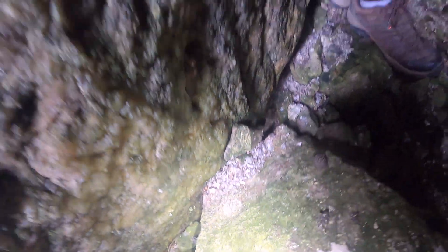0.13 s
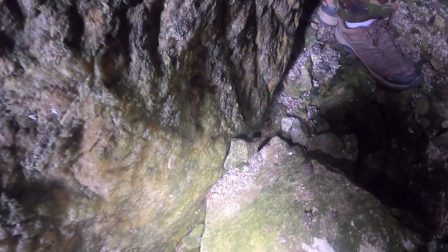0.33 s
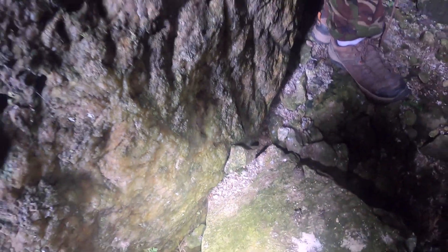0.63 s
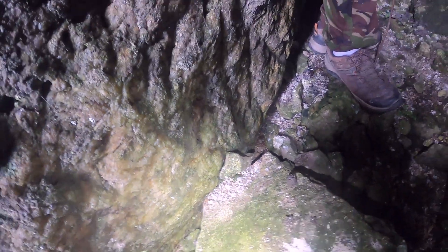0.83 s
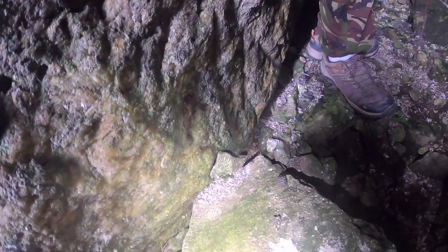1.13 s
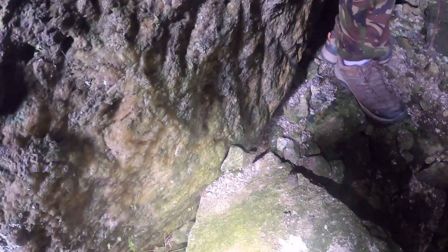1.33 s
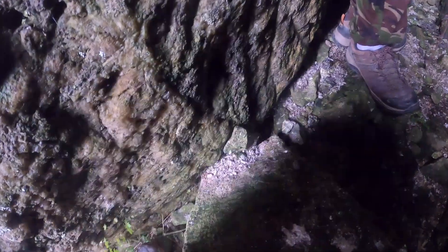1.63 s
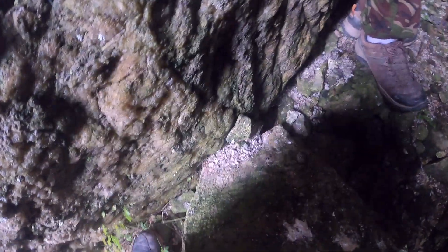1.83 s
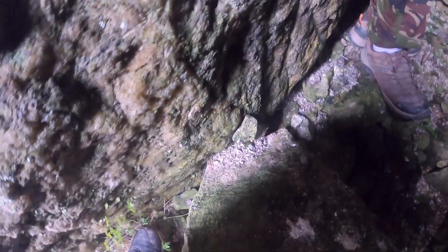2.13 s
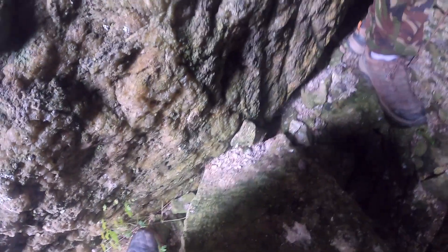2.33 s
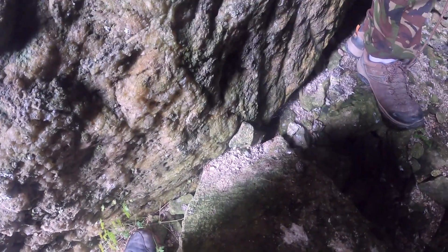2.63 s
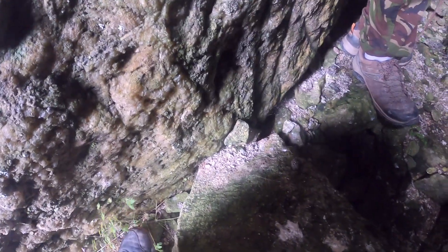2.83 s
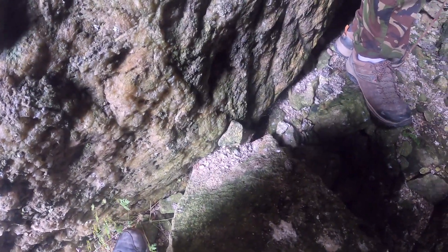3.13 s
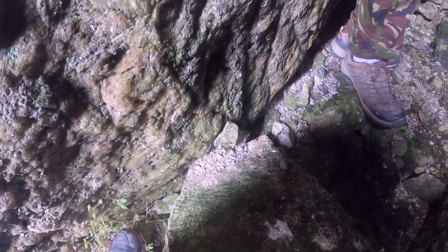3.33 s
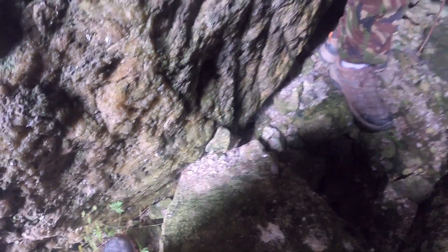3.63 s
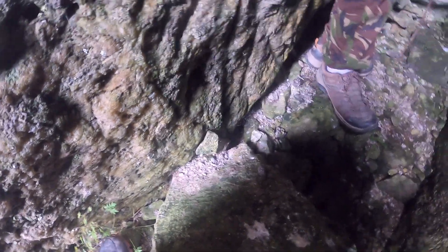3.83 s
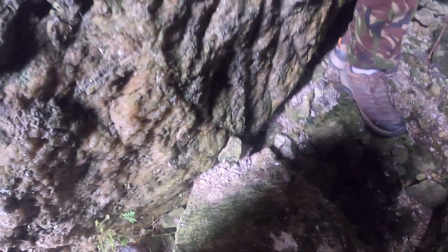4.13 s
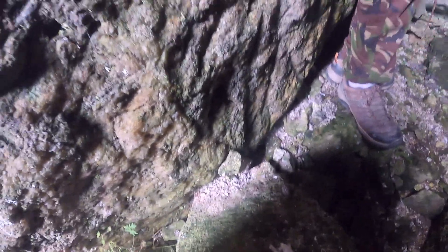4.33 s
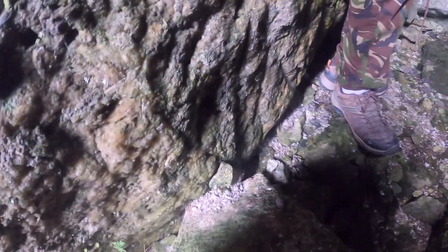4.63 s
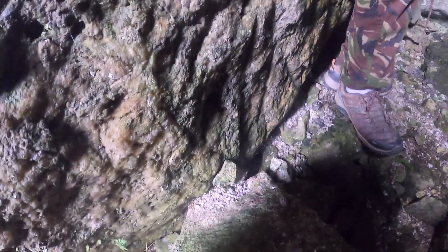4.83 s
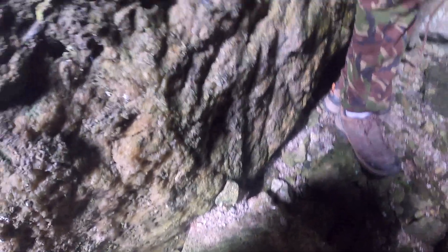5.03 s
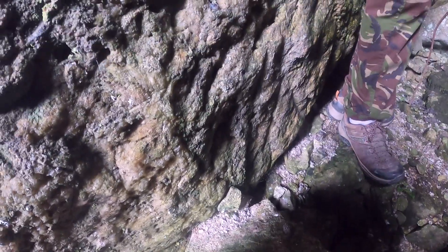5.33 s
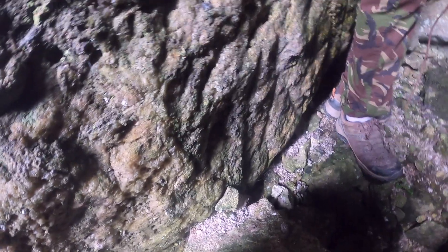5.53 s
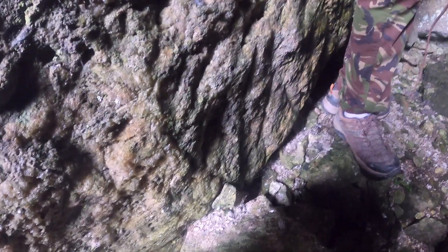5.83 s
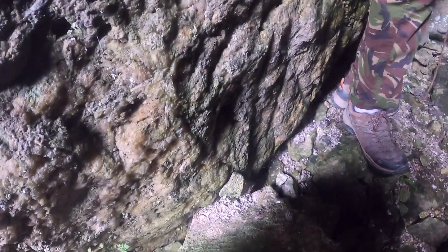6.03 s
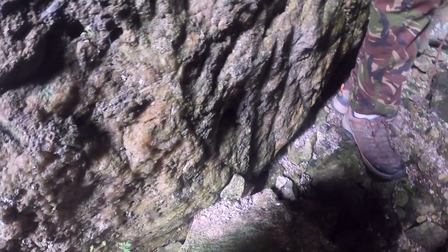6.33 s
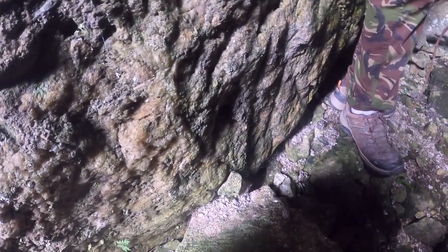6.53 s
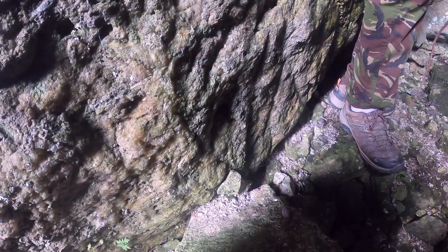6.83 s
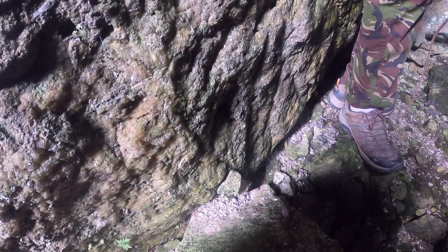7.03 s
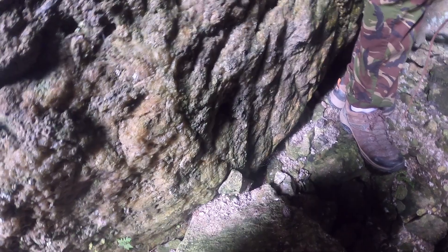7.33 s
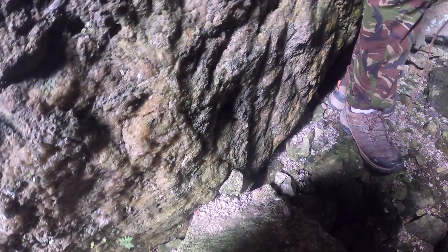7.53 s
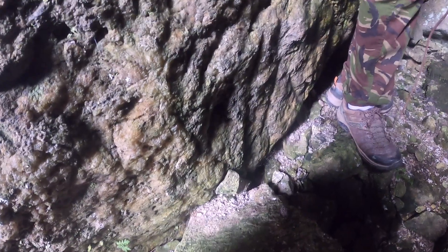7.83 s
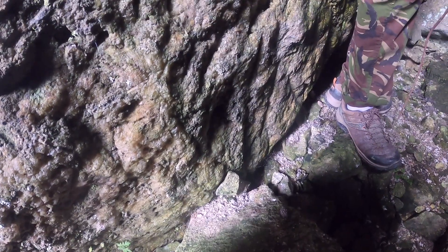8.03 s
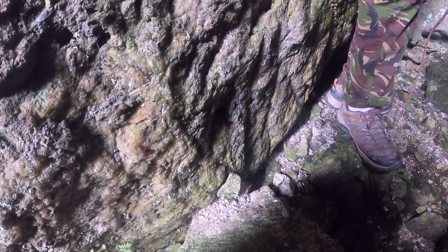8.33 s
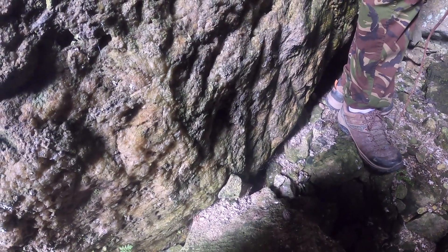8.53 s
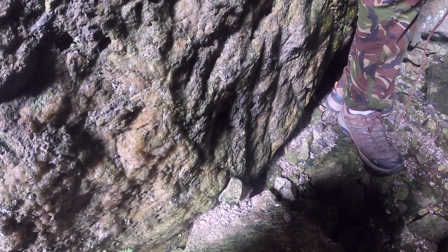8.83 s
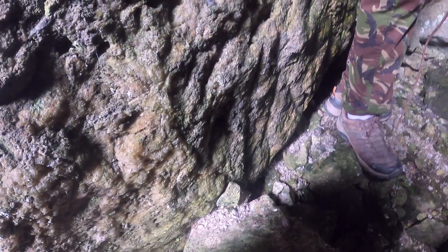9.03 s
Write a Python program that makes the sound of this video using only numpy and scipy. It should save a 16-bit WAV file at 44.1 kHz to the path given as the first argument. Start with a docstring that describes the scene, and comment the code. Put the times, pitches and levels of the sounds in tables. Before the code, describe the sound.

Close, handheld pickup in a quiet cave passage. Faint grit ticks open, then boots dislodge stones in a loud, dense run of hollow clacks. Knocks thin to soft taps, a second busier burst of clatter and gritty scraping follows midway, then sparser scuffs and a few sharp knocks fade into a low, dull hush. Low grip bumps and rumble run through it.

```python
"""Boots on loose rock in a cave passage

Stones knock and grit scrapes over a quiet floor; both excite one shared set of resonances.
Sliding stones groan, and a dull knock and a click join them, all as narrow-band noise; grit ticks are puffs.
A hand-held device hums and rumbles in the grip, with jolts that swell both.
A phase-shifted side signal makes the picture wide at first, then it narrows to near mono."""
import sys
import numpy as np
from scipy import signal
from scipy.fft import rfft, irfft
from scipy.io import wavfile
from scipy.ndimage import uniform_filter1d

SR = 44100
rng = np.random.default_rng(int(sys.argv[2]) if len(sys.argv) > 2 else 0)


def unload_audio(sound):
    """Save the sound as a 16-bit wav file, at the path given as the first command line argument."""
    columns = np.transpose(np.atleast_2d(sound))
    # keep every value between -1 and 1, then stretch to whole-number steps
    steps = np.round(np.clip(columns, -1, 1) * 32767)
    wavfile.write(sys.argv[1], SR, steps.astype(np.int16))


N = 404838

# Floor spectrum, relative. Each row: frequency in Hz, density in dB per Hz.
AIR_SPECTRUM = [(15, -41.5), (25, 2), (63, 0.5), (133, -17), (325, -7.5), (692, -10.5), (835, -14.5),
                (1190, -15.5), (1290, -13.5), (2270, -36), (4580, -40.5), (15800, -60.5)]
# Floor gain over time. Each row: time in seconds, gain in dB.
AIR_SWELL = [(0, 10), (.9, 9), (2.1, 4), (3.4, 4.5), (5.9, 8), (6.9, 1.5), (8.4, -0.5), (9.18, 1.5)]
AIR_BASE_DB, DRONE_HZ, DRONE_BASE_DB = -62, 210, -71.5  # levels before the swell

# Slow hum in the grip. Each row: time in seconds, level in dB.
HUM = [(0.0, -72), (0.54, -55), (0.84, -45), (1.28, -40), (1.45, -49.5), (2.1, -60.5), (2.48, -54.5),
       (2.96, -47), (3.71, -41), (4.27, -41), (5.29, -48.5), (6.21, -48.5), (6.41, -67), (6.9, -58),
       (7.29, -77.5), (7.59, -42.5), (7.95, -70.5), (9.18, -70)]
# Jolts of the held device. Each row: time in seconds, hum in dB, rumble in dB.
JOLTS = [(.64, -43, -73), (.78, -47.5, -43), (1.05, -37, -43), (1.151, -32, -46), (1.41, -31.5, -58),
         (1.71, -35.5, -60), (1.789, -33.5, -56), (2.48, -47.5, -48), (3.73, -34.5, -42.5),
         (4.14, -40.5, -36.5), (4.292, -41, -27), (4.518, -29, -24), (4.7, -49.5, -40), (5.19, -40.5, -36),
         (5.6, -33, -39.5), (6.106, -27.5, -62.5), (6.29, -39, -55), (6.41, -44, -49), (6.771, -41, -50),
         (6.93, -48.5, -72), (7.41, -42, -42.5), (7.592, -30, -30.5), (9.16, -48.5, -49)]
# Handling rumble spectrum, relative. Each row: frequency in Hz, density in dB per Hz.
RUMBLE_SPECTRUM = [(20, 6), (40, -4.5), (100, 2.5), (200, 5.5), (260, 6), (400, 9), (700, -45.5)]
JOLT_SPAN_S = 0.0097
RUMBLE_FLICKER_DB, RUMBLE_FLICKER_S = 4.5, 0.015

# Boot scuffs. Each row: start in seconds, rise in seconds, length in seconds, grind centre in Hz,
# grind in dB, grit hiss in dB, rumble in the grip in dB.
SCUFFS = [(0.088, 0.087, 0.28, 1267, -62, -76, -65.5), (0.33, 0.19, 0.16, 734, -51, -61, -56),
          (0.697, 0.023, 0.08, 582, -48, -53.5, -49.5), (0.862, 0.3, 0.29, 930, -41, -48.5, -46),
          (1.02, 0.023, 0.06, 1085, -35.5, -68, -59.5), (1.095, 0.04, 0.17, 1000, -32, -63, -50.5),
          (1.109, .04, 0.13, 2510, -45, -48, -56.5), (1.18, 0.05, 0.061, 1500, -39.5, -53.5, -53),
          (1.424, 0.021, 0.097, 836, -44.5, -84, -57.5), (1.551, .02, 0.35, 790, -47, -77, -66.5),
          (1.869, 0.024, 0.25, 800, -60.5, -72, -66), (2.17, 0.06, 0.17, 1300, -46.5, -60, -55.5),
          (2.413, 0.024, 0.071, 644, -44, -60, -61.5), (2.636, .02, .3, 556, -44.5, -56.5, -49.5),
          (2.983, .04, 0.29, 600, -53, -64.5, -52.5), (3.617, 0.055, 0.43, 565, -40, -49.5, -44),
          (3.811, 0.023, 0.045, 1920, -40.5, -40.5, -43), (3.942, 0.039, 0.16, 1217, -45.5, -51, -42),
          (4.152, 0.037, 0.5, 716, -49, -92, -51), (4.237, 0.018, 0.11, 1740, -48, -53, -49.5),
          (4.373, 0.065, 0.27, 695, -65, -43.5, -44), (4.581, 0.021, 0.083, 693, -38, -39, -42),
          (4.701, 0.031, 0.16, 661, -42, -44.5, -43.5), (4.912, 0.026, 0.28, 670, -48.5, -56, -49.5),
          (5.044, 0.071, 0.11, 1160, -44.5, -46.5, -38.5), (5.126, 0.015, 0.035, 1500, -41, -44.5, -50),
          (5.226, 0.022, 0.26, 562, -51, -68, -54.5), (5.412, 0.14, 0.35, 712.5, -45.5, -49, -48.5),
          (5.8, 0.02, 0.06, 600, -56.5, -71, -56.5), (5.901, 0.064, 0.29, 688, -47, -55.5, -45),
          (6.192, 0.037, 0.28, 541, -43, -49, -45), (6.566, 0.017, .4, 600, -63, -71, -63.5),
          (7.408, .02, 0.35, 536, -40.5, -50, -47), (7.5, 0.029, 0.15, 1600, -45, -49, -57.5),
          (7.79, 0.077, 0.14, 541, -46, -49.5, -46), (7.995, 0.02, 0.2, 700, -63, -80, -63.5),
          (8.05, .06, 0.15, 688, -56.5, -67, -60.5), (9.089, 0.19, 0.11, 1100, -39, -53.5, -52)]
# Shared stone modes. Each row: frequency in Hz, nominal width in Hz, relative level in dB.
STONE_MODES = [(489.4, 110, 9.5), (685, 680, 3), (860.4, 100, 6.5), (1088, 130, 3), (1292, 390, 6.5),
               (1720, 24, 10), (1978, 100, 8), (2540, 100, 8), (3153, 180, -3.5), (3430, 400, -20.5),
               (4300, 340, -7), (5314, 490, -16)]
# Grit hiss spectrum, relative. Each row: frequency in Hz, density in dB per Hz.
GRIT_SPECTRUM = [(530, -20), (900, 0.5), (1190, -8.5), (1990, -5), (2210, -13.5), (5510, -16),
                 (6360, -22.5), (7800, -21), (11100, -46.5), (12800, -41.5), (15800, -77)]
SCUFF_SAG_DB_PER_S, SCUFF_T60_S = 14.5, 0.42
GRIT_FLICKER_DB, GRIT_FLICKER_S = 2.5, 0.012
SOFT_HZ = 5160  # dusty contacts lose the top of the treble

# Grit ticks. Each row: time in seconds, peak in dB, centre in Hz.
TICKS = [(0.126, -54, 5590), (0.1395, -46, 2520), (0.1704, -41, 2420), (0.19, -41, 2570),
         (0.206, -43, 2320), (0.236, -39.5, 2450), (0.2514, -59, 2350), (0.2708, -56, 2460),
         (0.3082, -45, 4200), (0.392, -58, 2100), (0.716, -43, 2000), (0.9965, -35, 1910),
         (1.0492, -31, 2560), (1.1294, -31, 2600), (1.4817, -63, 2570), (2.5575, -42.5, 1890),
         (2.769, -63, 2170), (3.015, -49, 3160), (3.0754, -43, 1980), (3.654, -51, 2230),
         (4.408, -40, 1900), (4.473, -43, 1920), (4.6067, -29, 1990), (4.726, -35, 1940),
         (5.3407, -29.5, 2020), (5.747, -29, 1860), (5.811, -53, 2000), (6.006, -55, 2490),
         (6.02, -33, 1900), (6.158, -45.5, 4500), (6.988, -49, 2000), (7.8379, -31, 2630),
         (8.118, -62, 2600), (8.187, -49, 1947), (9.167, -36, 4500)]
TICK_T60_S, TICK_Q, TICK_EDGE_DB = 0.0077, 5.1, -29.5

# Stone knocks. Each row: time in seconds, level in dB, ring centre in Hz,
# crack treble in dB re level, thump in dB re level, nominal ring decay (t60) in seconds.
KNOCKS = [(0.13, -46, 430, -27, -11.5, 0.047), (0.169, -36, 1460, -4.5, -30.5, 0.015),
          (0.188, -48.5, 602, -1, -14.5, 0.052), (0.235, -44, 1310, -18, -14.5, 0.042),
          (0.304, -52, 410, -13, -23.5, 0.03), (0.396, -44, 484, -16, -19.5, 0.032),
          (0.721, -46, 404, 8, -17, 0.023), (0.965, -14.5, 1230, -31.5, -30.5, 0.011),
          (1.015, -16.5, 1147, -24, -24.5, 0.045), (1.057, -16, 1070, -28, -27.5, 0.06),
          (1.057, -21, 2590, -18, -37.5, 0.025), (1.06, -20, 480, -39, -29.5, 0.039),
          (1.09, -20.5, 477, -37, -30.5, 0.035), (1.086, -14, 910, -29, -33, 0.025),
          (1.086, -13, 2620, -11.5, -35.5, 0.02), (1.118, -24, 525, -34, -17.5, 0.035),
          (1.14, -20.5, 1090, -28, -14, 0.03), (1.148, -17.5, 950, -17, -30, 0.063),
          (1.16, -20.5, 1035, -11, -27.5, 0.016), (1.171, -21, 1170, -27, -28, 0.027),
          (1.19, -24, 1160, -19, -29, 0.035), (1.214, -22, 1117, -32, -26, 0.037),
          (1.259, -26.5, 2630, -29, -39, 0.03), (1.266, -20.5, 870, -18, -23, 0.024),
          (1.289, -16.5, 906, -30, -26, 0.025), (1.296, -7, 875, -15.5, -32, 0.025),
          (1.302, -6, 946, -41, -31, 0.014), (1.347, -11.5, 920, -43, -23.5, 0.026),
          (1.362, -7, 900, -49, -22, 0.016), (1.381, -7, 890, -22, -22.5, 0.015),
          (1.391, -10, 840, -46, -28.5, 0.024), (1.525, -29, 897, -37, -32.5, 0.04),
          (1.545, -12.5, 1020, -33, -40.5, 0.024), (1.567, -12.5, 1065, -22.5, -47, 0.014),
          (1.617, -20.5, 1820, -19, -40, 0.025), (1.63, -14.5, 953, -49, -33, 0.04),
          (1.659, -14.5, 1000, -35, -32.5, 0.018), (1.678, -25, 484, -37, -25, 0.023),
          (1.694, -19, 516, -12.5, -18, 0.016), (1.697, -13, 658, -27, -21.5, 0.015),
          (1.775, -12.5, 827, -18.5, -20.5, 0.024), (1.786, -20, 500, -42, -11, 0.043),
          (1.804, -15, 1230, -44, -21, 0.018), (1.824, -12, 927, -21, -38.5, 0.022),
          (1.83, -11.5, 1236, -9.5, -38.5, 0.025), (1.885, -25.5, 458, -44, -6, 0.016),
          (1.9, -25.5, 530, -41, -6, 0.027), (1.974, -40.5, 900, -46, -14.5, 0.028),
          (2.065, -39, 830, -34, -27, 0.033), (2.105, -16.5, 1025, -56, -42.5, 0.0082),
          (2.198, -18, 986, -53, -30, 0.012), (2.22, -12, 820, -46, -37, 0.02),
          (2.283, -14, 980, -20, -26, 0.038), (2.293, -20.5, 2047, -26, -34, 0.024),
          (2.293, -15, 828, -23, -28.5, 0.026), (2.301, -16.5, 909, -23, -25.5, 0.02),
          (2.375, -22, 835, -18.5, -36.5, 0.021), (2.432, -33.5, 840, -30, -29.5, 0.028),
          (2.447, -31.5, 473, -35, -14.5, 0.025), (2.445, -22.5, 1265, -11, -11.5, 0.016),
          (2.518, -43, 475, -4, -21, 0.014), (2.63, -27, 572, -28, -28.5, 0.024),
          (2.654, -26.5, 870, -18, -20.5, 0.016), (2.898, -29, 522, -42, -21, 0.048),
          (3.14, -34.5, 790, -26, -21.5, 0.013), (3.195, -41, 890, -35, -21, 0.027),
          (3.234, -30.5, 510, -13, -10, 0.029), (3.331, -36.5, 530, -25, -14.5, 0.016),
          (3.461, -41, 530, -19, -8.5, 0.043), (3.524, -41.5, 480, -21.5, -7, 0.034),
          (3.632, -38, 474, -40, -16.5, 0.023), (3.706, -21.5, 1376, -15, -6, 0.016),
          (3.809, -36.5, 440, -20, -9, 0.053), (3.841, -12.5, 1170, -9, -21.5, 0.022),
          (4.121, -15, 774, -26, -22, 0.021), (4.258, -35.5, 1700, -23, -11.5, 0.03),
          (4.266, -23.5, 1680, -15, -30.5, 0.04), (4.278, -7, 1950, -11.5, -8.5, 0.011),
          (4.286, -18.5, 420, -30.5, -10, 0.034), (4.388, -14, 692, -39, -33, 0.014),
          (4.43, -27, 645, -30, -18, 0.052), (4.509, -14.5, 713, -4.5, -5, 0.012),
          (4.516, -24, 790, -29, -10, 0.026), (4.617, -13.5, 835, -51, -32.5, 0.023),
          (4.622, -15.5, 525, -50, -31, 0.036), (4.638, -15.5, 670, -49, -27.5, 0.03),
          (4.66, -23.5, 610, -30, -27, 0.037), (4.678, -21.5, 483, -14, -10.5, 0.012),
          (4.724, -29.5, 794, -28, -24, 0.045), (4.743, -22.5, 540, -20, -17.5, 0.012),
          (4.808, -35, 415, -6, -15, 0.028), (4.842, -23.5, 640, -24, -9, 0.024),
          (4.946, -33.5, 479, -12, -13, 0.047), (4.995, -28, 705, -16, -19.5, 0.011),
          (5.071, -22, 506, -14.5, -13.5, 0.023), (5.094, -27.5, 825, -13, -18.5, 0.034),
          (5.13, -9, 734, -33, -40, 0.013), (5.192, -21, 510, -34, -10.5, 0.014),
          (5.273, -29, 490, -54, -18, 0.017), (5.339, -32, 497, -11, -15, 0.097),
          (5.39, -32.5, 930, -0.5, -15, 0.024), (5.494, -36, 930, -10, -22, 0.017),
          (5.579, -30.5, 475, -8.5, -12.5, 0.028), (5.597, -27, 450, -3.5, -16, 0.06),
          (5.643, -29.5, 1290, 0.5, -28, 0.033), (5.744, -32, 526, -12, -13.5, 0.036),
          (5.81, -41.5, 487, -29, -8, 0.05), (6.018, -28, 480, -9.5, -12.5, 0.081),
          (6.043, -18, 535, -15.5, -50.5, 0.014), (6.056, -10, 885, -15.5, -18, 0.014),
          (6.104, -32.5, 480, -15, -5.5, 0.038), (6.156, -53.5, 1210, -11, -10, 0.014),
          (6.248, -30.5, 490, -37, -17, 0.014), (6.555, -39, 500, -6.5, -33, 0.038),
          (6.76, -35, 505, -54, -21, 0.022), (6.927, -37.5, 490, -55, -12.5, 0.0103),
          (6.986, -35.5, 483, -24, -8.5, 0.013), (6.987, -38, 2220, -19, -27.5, 0.016),
          (7.233, -47.5, 518, -19, -24, 0.017), (7.397, -24, 457, -17.5, -12.5, 0.028),
          (7.476, -23.5, 465, -18, -42, 0.025), (7.558, -34.5, 519, -3, -4, 0.018),
          (7.595, -12, 1490, -3.5, -37, 0.0093), (7.663, -30.5, 450, -9, -8.5, 0.028),
          (7.837, -38.5, 438, -1, -12, 0.025), (8.125, -42, 740, -24, -22.5, 0.043),
          (8.188, -41.5, 1960, -7, -20.5, 0.014), (8.298, -49.5, 650, -33, -21.5, 0.031),
          (8.348, -44, 487, -41, -27, 0.0077), (8.403, -47.5, 458, -27, -14, 0.017),
          (9.019, -43, 455, -46, -9.5, 0.018), (9.118, -33, 526, -30, -9.5, 0.063),
          (9.155, -27, 440, -21, -16, 0.025)]
OWN_SHARE = 0.51  # struck stone's own note against the shared modes
SWELL_SHARE = 0.034  # attack time per second of t60
BODY_LOW_HZ = 355  # small stones radiate little below this
CRACK_CREST_DB = 5  # crack peak above its treble level, before softening

# Narrow-band noises: sliding stones, plus a dull knock at 1.764 s and a click at 6.975 s.
# Each row: start in seconds, length in seconds, pitch in Hz, level in dB.
NARROW_NOISES = [(0.73, 0.051, 4430, -61.5), (1.11, 0.09, 2530, -39), (1.257, 0.032, 2580, -34),
                 (1.429, 0.06, 888, -26.5), (1.44, 0.05, 3220, -63), (1.484, 0.035, 903, -33.5),
                 (1.732, 0.035, 513, -41), (1.764, 0.015, 471, -23), (2.452, 0.049, 859, -43.5),
                 (2.274, 0.026, 788, -27), (4.248, 0.033, 1700, -51), (4.932, 0.026, 2900, -47.5),
                 (5.162, 0.026, 1820, -39), (6.975, 0.032, 2500, -64), (7.183, 0.055, 2900, -77.5),
                 (7.379, 0.038, 2740, -54.5), (7.561, 0.082, 4490, -38)]
NARROW_NOISE_Q = 14

# Stereo picture. Each row: time in seconds, side gain in dB, side phase lean in rad,
# lift of the top treble in dB.
WIDTH = [(0, -6.5, -0.35, -1.5), (.5, -6, -0.35, 7), (.85, -6, -0.34, 3), (1, -3.5, 0.27, -1.5),
         (1.85, -3.5, 0.23, -6), (2.15, -8, 0.23, -4), (2.5, -17.5, 0.26, 0), (2.8, -24, 0, -1),
         (3.05, -63.5, -0.042, -0.5), (9.18, -52, -0.33, -2)]
# Side response before the width gain. Each row: frequency in Hz, gain in dB, phase in rad.
SIDE_PORT = [(59, -10, -1.5), (200, -11, -1), (400, -0.5, -1.82), (810, 3.5, -2), (1300, 3, -1.58),
             (2400, 4, -1), (4400, 1.5, -1), (8000, 5, -2), (15000, 8.5, -3)]
LIFT_LOW_HZ, LIFT_HIGH_HZ = 5940, 12000
TOP_LAG_S, TOP_SIDE_DB = 0.004, -2.5  # top treble enters the side again, late
EDGE_HZ = 15900


def gain_of(db):
    """Decibels to an amplitude factor."""
    return 10 ** (np.asarray(db) / 20)


def evened(x):
    """Scales to rms 1."""
    return x / np.sqrt(np.mean(x ** 2) + 1e-20)


def read(points, hz, column=1):
    """Interpolates a spectrum table over log frequency."""
    table = np.transpose(points)
    return np.interp(np.log(hz + 1), np.log(table[0] + 1), table[column])


def follow(rows):
    """Interpolates each column of a time table to every sample."""
    s, *columns = np.transpose(rows)
    return [np.interp(np.arange(N) / SR, s, column) for column in columns]


def coloured(x, points):
    """Filters x by a spectrum table, then scales to rms 1."""
    response = gain_of(read(points, np.fft.rfftfreq(N, 1 / SR)))
    return evened(irfft(rfft(x) * response, N))


def ring(x, hz, width_hz):
    """Two-pole resonance; its bandwidth sets the decay."""
    r = np.exp(-np.pi * width_hz / SR)
    return signal.lfilter([1 - r, 0, r - 1], [1, -2 * r * np.cos(2 * np.pi * hz / SR), r * r], x)


def flicker(db, span_s):
    """Random gain, db rms of wander over about span_s, at rms 1."""
    size = max(round(span_s * SR), 1)
    wander = uniform_filter1d(uniform_filter1d(rng.standard_normal(N), size), size)
    return evened(gain_of(db * evened(wander)))


def grains(per_s, spread_db, share):
    """Sparse clicks of very unequal size mixed into even noise."""
    size = gain_of(spread_db * np.minimum(rng.exponential(1, N), 3.6))
    size = size * (rng.random(N) < per_s / SR)
    clicks = evened(size * rng.standard_normal(N))
    return share * clicks + (1 - share) * rng.standard_normal(N)


def near(hz, centre_hz, octaves):
    """Contact excites mostly modes close to its own pitch: Gaussian in octaves."""
    return np.exp(-.5 * (np.log2(hz / centre_hz) / octaves) ** 2)


def softened(x):
    """Third-order low-pass: dust rolls off the treble."""
    return signal.sosfilt(signal.butter(3, SOFT_HZ, fs=SR, output="sos"), x)


def patchy(x, db):
    """Colour wanders in patches of several hundred Hz and a few tens of ms."""
    z = signal.stft(x, nperseg=256)[2]
    patches = uniform_filter1d(rng.standard_normal(z.shape), size=5, axis=0)
    patches = uniform_filter1d(patches, size=14, axis=1)
    return evened(signal.istft(z * gain_of(db * evened(patches)), nperseg=256)[1][:N])


def air():
    """Passage floor: shaped noise plus a faint narrow-band drone, on one slow swell."""
    drone = evened(ring(rng.standard_normal(N), DRONE_HZ, 30))
    noise = coloured(rng.standard_normal(N), AIR_SPECTRUM)
    floor = gain_of(AIR_BASE_DB) * noise + gain_of(DRONE_BASE_DB) * drone
    return floor * gain_of(follow(AIR_SWELL)[0])


def handling(rumble_gain):
    """Gripped body: resonant hum near 50 Hz and low rumble; jolts add power to both."""
    s, *jolt_db = np.transpose(JOLTS)
    step = 100  # samples per envelope point
    bumps = np.exp(-((np.arange(0, N, step)[:, None] / SR - s) / JOLT_SPAN_S) ** 2)
    jolt_power = bumps @ gain_of(jolt_db).T ** 2
    hum_jolt, rumble_jolt = np.repeat(jolt_power, step, axis=0)[:N].T
    hum = evened(ring(ring(rng.standard_normal(N), 50, 25), 53.0, 39))
    hum = hum / np.sqrt(uniform_filter1d(hum ** 2, size=SR // 8) + 1e-3)  # level out slow swings
    rumble = coloured(rng.standard_normal(N), RUMBLE_SPECTRUM)
    rumble = rumble * flicker(RUMBLE_FLICKER_DB, RUMBLE_FLICKER_S)
    hum_gain = np.sqrt(gain_of(follow(HUM)[0]) ** 2 + uniform_filter1d(hum_jolt, size=200))
    rumble_gain = np.sqrt(rumble_gain ** 2 + uniform_filter1d(rumble_jolt, size=200))
    return hum_gain * hum + rumble_gain * rumble


def scuffing():
    """Scuffs swell, sag and die away: gains of grind, grit, rumble and each mode's share."""
    t = np.arange(0, N + 64, 64) / SR
    modes_hz, _, modes_db = np.transpose(STONE_MODES)
    power = np.full((3 + len(STONE_MODES), len(t)), 1e-14)
    for s, rise, length, hz, *db in SCUFFS:
        sag_db = SCUFF_SAG_DB_PER_S * np.maximum(t - s - rise, 0)
        decay_db = 60 * np.maximum(t - s - length, 0) / SCUFF_T60_S
        envelope = np.clip((t - s) / max(rise, .005), 0, 1) * gain_of(-sag_db - decay_db)
        stir = gain_of(modes_db) * (near(modes_hz, hz, 0.4) + 0.027)
        mode_levels = gain_of(db[0]) * stir / np.linalg.norm(stir)
        levels = np.concatenate([gain_of(db), mode_levels])
        power += (levels[:, None] * envelope) ** 2
    gains = np.array([np.interp(np.arange(N) / SR, t, g) for g in np.sqrt(power)])
    return *gains[:3], gains[3:] / gains[0]


def scrape(grind_gain, grit_gain, stir):
    """Stick-slip grains ring the stone modes; finer grit hisses."""
    slips = grains(250, 1.7, 0.38) * flicker(2.7, 0.015)
    grind = np.zeros(N)
    for share, (hz, width, _) in zip(stir, STONE_MODES):
        grind += share * evened(ring(slips, hz, 60 + width * 0.13 * np.sqrt(hz / 800)))
    grind = grind / np.sqrt(uniform_filter1d(grind ** 2, size=SR // 4) + 1e-9)
    grit = patchy(coloured(grains(600, 3.8, 0.22), GRIT_SPECTRUM), 3.7)
    grit = grit * flicker(GRIT_FLICKER_DB, GRIT_FLICKER_S)
    return grind_gain * patchy(softened(grind), 2.1) + grit_gain * grit


def ticks():
    """Grit grain snaps: a noise puff around its pitch with a thin treble edge."""
    out, t = np.zeros(N + SR), np.arange(1000) / SR
    for (s, db, hz), draw in zip(TICKS, rng.standard_normal((len(TICKS), len(t)))):
        puff = draw * np.minimum(t / 0.00055, 1) * gain_of(-60 * t / TICK_T60_S)
        core = evened(ring(ring(puff, hz, hz / TICK_Q), hz, 2.2 * hz))
        tick = core + gain_of(TICK_EDGE_DB) * evened(ring(puff, 7000, 8000))
        at = round((s - .001) * SR)  # starts 1 ms ahead
        out[at:at + len(t)] += gain_of(db) * tick / abs(tick).max()
    return out[:N]


def knock(db, centre_hz, crack_db, thump_db, t60, chance):
    """Own note and shared modes swell and decay; a bright crack and a low push join them."""
    t = np.arange(len(chance) // 2) / SR
    rise = 1 - np.exp(-(t / (0.0012 + SWELL_SHARE * t60)) ** 2)
    decay = t / max(t60, .008)
    hz, width, mode_db = np.transpose(STONE_MODES)[:, :, None]
    fade = gain_of(-60 * decay ** 1.24 * (width / 50) ** 0.1 * (hz / 900) ** 0.29) * rise
    # harder contacts, those with more crack, wake more modes
    spill = 0.43 * gain_of(0.42 * (crack_db + 24)) * np.minimum(900 / hz, 1) ** 0.59
    weight = gain_of(mode_db + 2.0 * chance[50:50 + len(hz), None])
    weight = weight * (near(hz, centre_hz, 0.34) + spill)
    chatter = evened(uniform_filter1d(chance[len(t):], size=40)) * 0.3 * np.sqrt(hz / 900)
    detuned_hz = hz * (1 + 0.042 * chance[:len(hz), None])
    phase = 2 * np.pi * detuned_hz * t + 0.3 * chance[-len(hz):, None] + chatter
    modes = (weight * fade * np.sin(phase)).sum(0)
    own = np.sin(2 * np.pi * centre_hz * t) * rise * gain_of(-60 * decay ** 1.3 * 1.2)
    body = modes / abs(modes).max() + OWN_SHARE * own / abs(own).max()
    body = signal.sosfilt(signal.butter(2, BODY_LOW_HZ, "high", fs=SR, output="sos"), body)
    crack_fade = gain_of(-60 * t / 0.0089) + 0.093 * gain_of(-60 * t / 0.052)
    crack = ring(chance[:len(t)] * rise * crack_fade, 2500, 3900)
    # three cycles at most, falling in pitch
    thump = np.sin(2 * np.pi * 3.0 * (1 - np.exp(-t / 0.013))) * gain_of(-60 * t / 0.068)
    parts = [(body, 0), (crack, crack_db + CRACK_CREST_DB), (thump, thump_db)]
    return sum(gain_of(db + rel_db) * part / abs(part).max() for part, rel_db in parts)


def knocks():
    """Sums the stone impacts, each with its own random draw."""
    out, chance = np.zeros(N + SR), rng.standard_normal((len(KNOCKS), 8000))
    for (s, *row), draw in zip(KNOCKS, chance):
        at = round((s - .001) * SR)  # starts 1 ms ahead
        out[at:at + len(draw) // 2] += knock(*row, draw)
    return out[:N]


def walls(x):
    """Close rough rock returns a short, dense tail whose treble dies first."""
    t = np.arange(SR // 5) / SR
    noise = rng.standard_normal(len(t)) * (t > .003)
    low = signal.sosfilt(signal.butter(2, 1500, fs=SR, output="sos"), noise)
    tail = low * gain_of(-60 * t / 0.067) + 0.53 * (noise - low) * gain_of(-60 * t / 0.052)
    return signal.oaconvolve(x, tail / np.linalg.norm(tail))[:N]


def narrow_noises():
    """Groans, a dull knock and a click: rough noise in one resonance swells and fades."""
    out = np.zeros(N)
    for s, length, hz, db in NARROW_NOISES:
        t = np.arange(0, length, 1 / SR)
        noise = rng.standard_normal(SR // 4)[:len(t)]
        band = ring(ring(noise, hz, hz / NARROW_NOISE_Q), hz, 3 * hz / NARROW_NOISE_Q)
        arch = np.sin(np.pi * (t / length) ** 1.2)
        out[round(s * SR):][:len(t)] += gain_of(db) * evened(band) * arch
    return out


def scene():
    """Sums all layers into two identical channels."""
    grind_gain, grit_gain, rumble_gain, stir = scuffing()
    mid = air() + handling(rumble_gain)
    mid = mid + scrape(grind_gain, grit_gain, stir) + ticks()
    stones = softened(knocks())
    mid = mid + stones + gain_of(-14.5) * walls(stones) + narrow_noises()
    return np.array([mid, mid])


def record(dry):
    """Varies the top treble, adds a phase-shifted side signal, limits the band."""
    mid, hz = dry.mean(0), np.fft.rfftfreq(N, 1 / SR)
    width_db, lean_rad, lift_db = follow(WIDTH)
    band = signal.butter(2, [LIFT_LOW_HZ, LIFT_HIGH_HZ], "band", fs=SR, output="sos")
    top = signal.sosfiltfilt(band, mid)
    mid = mid + (gain_of(lift_db) - 1) * top
    port = gain_of(read(SIDE_PORT, hz)) * np.exp(1j * read(SIDE_PORT, hz, column=2))
    side = signal.hilbert(irfft(rfft(mid) * port, N))
    side = (side * np.exp(1j * lean_rad)).real * gain_of(width_db)
    late_top = np.roll(top, round(TOP_LAG_S * SR))
    side = side + late_top * gain_of(width_db + TOP_SIDE_DB)
    pair = np.array([mid + side, mid - side])
    low_pass = signal.firwin(511, EDGE_HZ, window=("kaiser", 9), fs=SR)
    return signal.oaconvolve(pair, low_pass[None], "same")


dry = scene()
out = record(dry)
unload_audio(out)
```